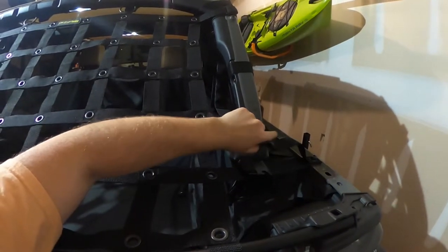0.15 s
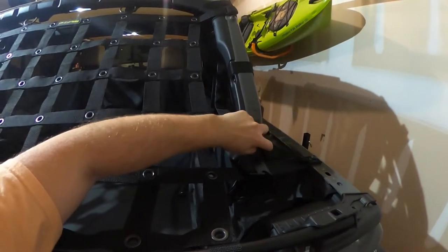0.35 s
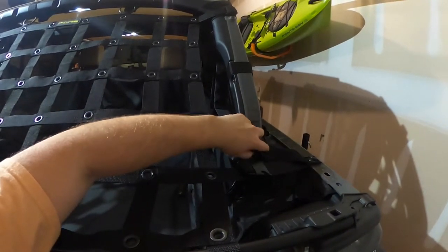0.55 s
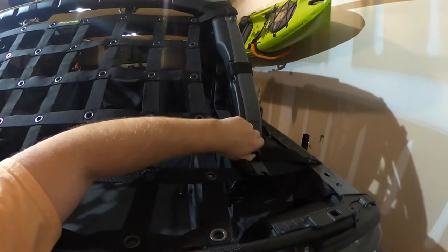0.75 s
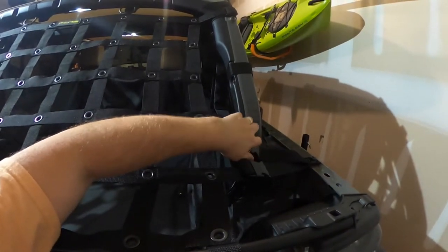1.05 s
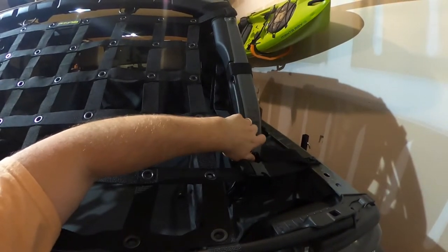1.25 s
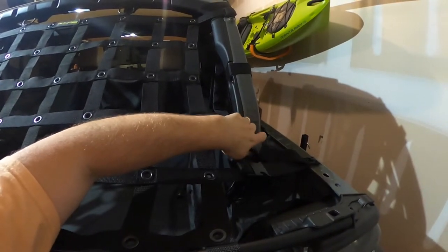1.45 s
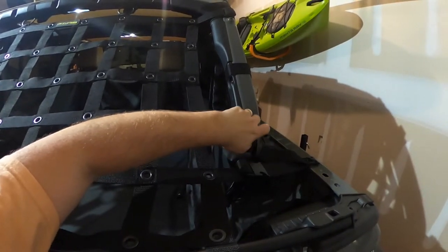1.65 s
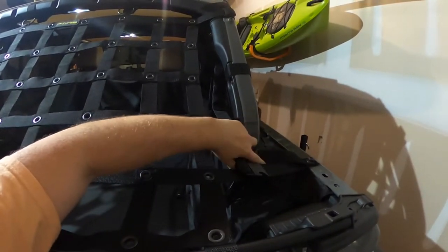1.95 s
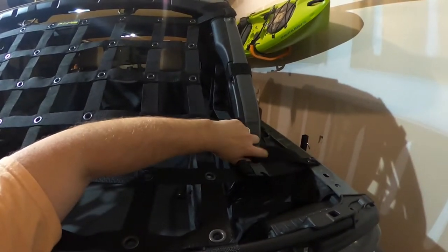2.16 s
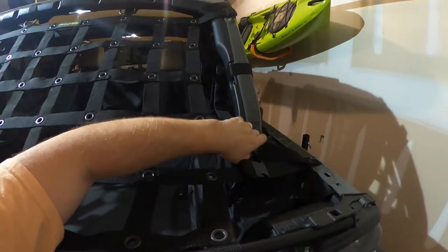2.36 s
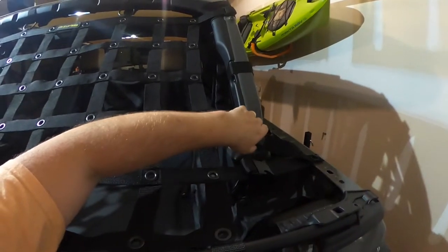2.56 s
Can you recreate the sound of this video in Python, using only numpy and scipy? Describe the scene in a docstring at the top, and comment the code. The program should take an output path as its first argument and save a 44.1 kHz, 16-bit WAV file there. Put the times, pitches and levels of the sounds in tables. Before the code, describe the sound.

Small metal buckle clicks and taps with faint strap rustle and soft knocks in an echoing garage

```python
"""Strap and buckle on a roll bar

A hand works a nylon strap and its metal buckle against a roll bar in a garage.
Buckle contacts are short noisy clicks that set the metal ringing; the webbing rustles as dense tiny grains.
Soft pushes knock the webbing and frame. The garage echoes, over a mains hum, a low rumble and a noise floor."""
import sys
import numpy as np
from scipy import signal
from scipy.fft import rfft, irfft
from scipy.io import wavfile

SR = 44100
rng = np.random.default_rng(int(sys.argv[2]) if len(sys.argv) > 2 else 0)


def to_wav(s):
    """Save 16-bit WAV."""
    ch = np.atleast_2d(s).T  # columns
    pcm = np.round(np.clip(ch, -1, 1) * 32767)  # PCM
    wavfile.write(sys.argv[1], SR, pcm.astype(np.int16))


N = 119070  # length of the scene in samples

# Noise floor, relative: pitch_hz, level_db (per Hz)
FLOOR_COLOUR = [(11, -33), (18, -4), (91, -5.5), (317, -10), (495, -15), (817, -24.5), (1140, -23.5),
                (2420, -28.5), (4350, -36.5), (7590, -38.5), (14000, -68)]
# Rumble over time, against RUMBLE_REFERENCE_DB: time_s, level_db
RUMBLE_LEVEL = [(0.0, -62), (0.61, -52.5), (0.69, -51.5), (0.83, -71), (1.04, -49.5), (1.23, -58.5),
                (1.41, -52), (1.62, -60), (1.98, -55), (2.16, -60.5), (2.56, -56), (2.7, -66)]
# Droning bands: pitch_hz, spread_hz (ring time is 4.9 / spread), level_db (added to DRONE_LEVEL)
DRONE_BANDS = [(38.4, 6.4, 8), (182.2, 9.1, 3.5), (281, 15.6, 1), (368, 4.2, -6.5)]
# Shared level of the droning bands over time: time_s, level_db
DRONE_LEVEL = [(0.0, -62.5), (0.8, -67), (1.02, -64.5), (2.09, -64.5), (2.2, -70.5), (2.7, -67)]
# Mains hum over time, before its waver: time_s, level_db
HUM_LEVEL = [(0.0, -64), (0.13, -66), (0.38, -58), (0.56, -53), (0.76, -51), (1.25, -52.5), (1.55, -56.5),
             (2.13, -53.5), (2.29, -49.5), (2.38, -52.5), (2.54, -52), (2.7, -61)]
# How alike left and right are in the room: pitch_hz, likeness (1 = the same)
LEFT_RIGHT_LIKENESS = [(30, 0.98), (120, 0.75), (280, 0.92), (600, 0.77), (2000, 0.093), (8000, 0.093)]
# Garage echo, time to fade by 60 dB: pitch_hz, fade_s
ECHO_FADE = [(700, 0.38), (2000, 0.41), (4000, 0.46), (8000, 0.48), (13000, 0.097)]
# Garage echo, relative: pitch_hz, level_db (per Hz)
ECHO_COLOUR = [(300, -17), (600, -10.5), (1200, -11), (2500, -5), (4000, -7), (5700, -10), (7700, 3),
               (9000, -3.5), (11000, -20), (14500, -53)]
# Knocks: start_s, level_db, webbing_pitch_hz, webbing_fade_s (by 60 dB), build_up_s, frame_db, edge_db
KNOCK_EVENTS = [(0.421, -54.5, 193, 0.23, 0.00092, 7, 5.5),
                (1.1556, -21.5, 188.7, 0.044, 0.00099, -13, -19.5),
                (1.379, -22, 190, 0.1, 0.00033, -8.5, -19.5),
                (2.012, -22.5, 188.5, 0.099, 0.0055, -37, -26.5), (2.109, -33, 182, 0.12, 0.001, -16, -21),
                (2.226, -24.5, 170, 0.11, 0.0099, -5, -29.5),
                (2.4408, -17.5, 199.5, 0.1, 0.00092, -2.5, -15.5)]
# Ringing of the frame: pitch_hz, level_db (relative), fade_s (by 60 dB)
FRAME_MODES = [(113, -17, 0.0082), (154, 4, 0.05)]
# Higher ringing from a knock's hard edge: pitch_hz, level_db (relative), fade_s (by 60 dB)
EDGE_MODES = [(422, -3, 0.045), (587, -2.5, 0.013), (800, -11, 0.039), (1140, -24.5, 0.05)]
# Strap strokes: start_s, rise_s, fall_s, level_db, metal_share (0 to 1), favoured_pitch_hz
STROKES = [(0.328, 0.029, 0.019, -66.5, 0.16, 3280), (0.547, 0.021, 0.094, -65, 0.65, 3440),
           (0.659, 0.026, 0.036, -72, 0.17, 5800), (0.808, 0.038, 0.049, -57, 0.62, 2870),
           (0.929, 0.048, 0.029, -66.5, 0.65, 2020), (1.038, 0.014, 0.048, -61, 0.62, 2480),
           (1.268, 0.026, 0.015, -57, 0.82, 2560), (1.501, 0.026, 0.017, -42, 0.82, 3400),
           (1.92, 0.022, 0.059, -65.5, 0.74, 7740), (2.104, 0.023, 0.048, -58, 0.3, 2010),
           (2.122, 0.026, 0.022, -70.5, 0.8, 3860), (2.112, 0.027, 0.036, -61, 0.44, 7500),
           (2.109, 0.0081, 0.016, -64, 0.5, 6300), (2.561, 0.044, 0.0099, -66, 1, 5560),
           (2.65, 0.031, 0.047, -75, 0, 1620)]
# Webbing rustle, relative: pitch_hz, level_db (per Hz)
WEBBING_COLOUR = [(530, -49), (900, 1.5), (964, 2.5), (2440, 1.5), (2740, -1.5), (3180, -9), (9920, -9),
                  (14000, -54)]
# Ringing of buckle and bar: pitch_hz, level_db (relative), fade_s (by 60 dB)
BAR_MODES = [(1170, -20, 0.09), (1382, -3, 0.013), (1810, -5, 0.0079), (2150, -12, 0.011),
             (2594, -16, 0.0056), (2953, -14, 0.01), (3320, -23, 0.072), (3770, -10.5, 0.0087),
             (4060, -29.5, 0.017), (4620, -8.5, 0.0038), (5320, -15.5, 0.011), (6407, -7.5, 0.007),
             (6800, -18.5, 0.0049), (7828, -8, 0.0051)]
# Buckle contacts: start_s, level_db, below_2khz_db, above_5khz_db, chatter_s,
# click_pitch_hz (favoured), ring_db, ring_pitch_hz (favoured)
CONTACTS = [(0.176, -39, -17, -8.5, 0.0032, 2150, 2, 2150),
            (0.4198, -45.5, -8, -2, 0.0035, 1810, -11.5, 1810),
            (0.6223, -43, -17, -3.5, 0.0046, 3940, 3, 4000), (0.841, -43, -3, -23, 0.0029, 2170, 4, 2700),
            (0.848, -28.5, -8, 0.5, 0.0026, 2520, 3.5, 4160),
            (1.0915, -27, 0.5, -22, 0.0023, 2470, 8, 1170),
            (1.0941, -18, -5, 0.5, 0.0047, 2470, -0.5, 3320),
            (1.2126, -29.5, -16, -9.5, 0.00042, 1950, 8.5, 1960),
            (1.2138, -31.5, 4, -12, 0.0013, 2000, 2, 2300), (1.3074, -35, -3, -4.5, 0.0032, 2400, 4, 2460),
            (1.3154, -39.5, -13, -1.5, 0.0046, 2400, 7, 3950),
            (1.3364, -24, -9.5, -6, 0.0046, 3720, -5, 4040), (1.5206, -30, -3, -9, 0.0094, 3670, 8, 3440),
            (1.524, -21.5, -9.5, -3.5, 0.0095, 3450, -8, 3560),
            (1.5355, -29, -3, -27, 0.0023, 3460, 5, 1700), (1.542, -45, -13, -53, 0.0017, 2500, -1, 2420),
            (1.608, -36, -27, -13, 0.0065, 3300, 5.5, 3350),
            (1.7755, -13.5, -8, -9.5, 0.0012, 1296, 0, 3600),
            (1.9923, -27.5, -4.5, 0, 0.005, 3040, 2, 3180),
            (2.1444, -34.5, -20, -21, 0.003, 3900, -1.5, 3900),
            (2.1534, -35.5, -5, -18.5, 0.0048, 3770, 7, 3750),
            (2.187, -31, -8, -11, 0.0019, 3850, -4, 3960)]
# Click noise, relative: pitch_hz, level_db (per Hz)
CLICK_COLOUR = [(300, -33), (800, -40), (1200, 16), (2500, 8.5), (4000, 4), (5700, 2.5), (7000, 9.5),
                (9500, -1.5), (12000, -24), (15000, -44)]

FLOOR_DB, FLOOR_PATCHY_DB, RUMBLE_REFERENCE_DB = -55.5, 1.5, -60.5
MURMUR_START_DB, MURMUR_END_DB = -1, -6.5  # the floor at 400-1000 Hz fades over the scene
HUM_HZ, HUM_WANDER_HZ, HUM_WAVER_DB, HUM_PAN_DB = 120.05, 1.48, 2.5, 0.5
ECHO_DB, ECHO_RISE_S, ECHO_ALIKE = -1.5, 0.0017, 0.8
PUSH_S, KNOCK_LOW_HZ, KNOCK_PAN_DB = 0.0037, 78.5, 2.95
RUB_GRAINS_PER_S, RUB_ALIKE, RUB_METAL_DB = 8100, 0.41, -5.0
RUB_FAVOUR_DB, RUB_FAVOUR_Q = 15, 9  # added band: level and sharpness
BAR_DB = -15
BAR_SPREAD_DB, BAR_DETUNE = 2, 0.007  # random spread of each mode's level and pitch (a fraction) per contact
CHATTER_PER_S, CHATTER_ALIKE = 3200, 0.9
CHATTER_FORCE_DB = -16  # how hard the chatter after the blow shakes the metal
CONTACT_S = 0.00012  # fade time of the blow's short 5 kHz burst
CLICK_FAVOUR_DB, CLICK_FAVOUR_Q = 10.5, 11
RING_FAVOUR_DB, RING_FAVOUR_Q = 7.5, 9
CLICK_DB, METAL_DB, BUCKLE_PAN_DB = -12.0, 0.5, 0.2
METAL_LOW_HZ = 910  # the metal ringing is thinned below this pitch
MIC_LOW_HZ, MIC_HIGH_HZ, CUTOFF_HZ = 22.3, 11600, 15400


def amp(db):
    """Turn decibels into a plain multiplier."""
    return 10 ** (np.asarray(db) / 20)


def rms_one(x):
    """Scale a sound to an average (rms) strength of 1."""
    return x / np.sqrt(np.mean(x ** 2) + 1e-20)


def at_hz(points, hz):
    """Read a table at a pitch, with straight lines between points on a log pitch scale."""
    pitches, values = np.array(points).T
    return np.interp(np.log(np.maximum(hz, 1)), np.log(pitches), values, left=values[0])


def in_time(curve):
    """Draw a table of times and values as a curve over the whole scene."""
    return np.interp(np.arange(N) / SR, *np.transpose(curve))


def pan(x, db):
    """Make the left side louder than the right by this many decibels."""
    return x * amp([[db / 2], [-db / 2]])


def stereo(mid, side, alike):
    """Mix two independent noises so that left and right share the wanted likeness."""
    alike = np.clip(alike, 0, 1)
    return np.sqrt(1 + alike) * mid + np.sqrt(1 - alike) * side * [[1], [-1]]


def drift(rate):
    """Smooth random wander of spread about 1; a higher rate in Hz wanders faster."""
    step = 40  # draw one value per 40 samples, then join them by lines
    r = np.exp(-2 * np.pi * rate * step / SR)
    noise = rng.standard_normal(N // step + 2002)
    slow = signal.lfilter([1], [1, -2 * r, r * r], noise)[2000:]  # drop the filter's start
    return np.interp(np.arange(N) / step, np.arange(len(slow)), rms_one(slow))


def ring(x, hz, t60):
    """A damped resonance: a unit click starts a sine of height about 1 that fades 60 dB in t60 seconds."""
    r = amp(-60 / (t60 * SR))
    w = 2 * np.pi * hz / SR
    return signal.lfilter([0, np.sin(w)], [1, -2 * r * np.cos(w), r * r], x + 1e-18)


def favour(x, hz, added_db, q):
    """Add a narrow band at hz to the sound, lifting one region of its spectrum."""
    return x + amp(added_db) * signal.lfilter(*signal.iirpeak(hz, q, fs=SR), x)


def colour(x, spectrum):
    """Shape the spectrum with a filter that acts as early as possible and keeps white noise as strong."""
    log_gain = at_hz(spectrum, np.linspace(0, SR / 2, 1025)) * np.log(10) / 20
    cepstrum = irfft(log_gain)
    cepstrum[1:1024] *= 2  # fold the second half onto the first: minimum phase
    cepstrum[1025:] = 0
    h = irfft(np.exp(rfft(cepstrum)))
    h = h / np.linalg.norm(h)
    return signal.oaconvolve(x, h[None], axes=-1)[..., :x.shape[-1]]


def grains(count, per_s, spread_db):
    """Random clicks of either sign and, if spread_db is not 0, uneven size; rms about 1."""
    size = amp(spread_db * np.minimum(rng.exponential(1, count), 4))
    signed = size * rng.choice([-1, 1], count)
    return rms_one(signed * (rng.random(count) < per_s / SR))


def bands():
    """Half-octave filters from 16 Hz up, each with its middle pitch."""
    edges = 16 * 2 ** np.arange(0, 10.1, 0.5)
    for low, high in zip(edges, edges[1:]):
        yield np.sqrt(low * high), signal.butter(2, [low, high], "band", fs=SR, output="sos")


def noise_floor():
    """Noise split into bands of patchy level, with a changing rumble at the bottom."""
    white, floor = rng.standard_normal((2, 2, N)), 0
    for k, (hz, sos) in enumerate(bands()):
        gain = amp(at_hz(FLOOR_COLOUR, hz) + FLOOR_PATCHY_DB * drift(8.1))
        if hz < 75:
            gain = gain * amp(in_time(RUMBLE_LEVEL) - RUMBLE_REFERENCE_DB)
        if 400 < hz < 1000:
            gain = gain * amp(np.linspace(MURMUR_START_DB, MURMUR_END_DB, N))
        mid, side = signal.sosfilt(sos, white[k % 2])
        floor = floor + gain * stereo(mid, side, at_hz(LEFT_RIGHT_LIKENESS, hz))
    return amp(FLOOR_DB) * rms_one(floor)


def drones():
    """Noise through narrow resonances hovers around a few pitches."""
    out = np.zeros((2, N))
    for hz, spread, db in DRONE_BANDS:
        mid, side = ring(rng.standard_normal((2, N)), hz, 4.9 / spread)
        tone = rms_one(stereo(mid, side, at_hz(LEFT_RIGHT_LIKENESS, hz)))
        out += amp(db + in_time(DRONE_LEVEL)) * tone
    return out


def mains_hum():
    """One sine whose pitch and level waver a little."""
    pitch = HUM_HZ + HUM_WANDER_HZ * drift(5.26)
    hum = np.sqrt(2) * np.sin(2 * np.pi * np.cumsum(pitch) / SR)
    return pan(amp(in_time(HUM_LEVEL) + HUM_WAVER_DB * drift(15)) * hum, HUM_PAN_DB)


def garage(force):
    """Reverberation: stereo noise that dies band by band, convolved with the source."""
    t = np.arange(SR) / SR
    white, tail = rng.standard_normal((2, 2, SR)), 0
    for k, (hz, sos) in enumerate(bands()):
        if hz > 400:
            mid, side = signal.sosfilt(sos, white[k % 2])
            tail = tail + stereo(mid, side, ECHO_ALIKE) * amp(-60 * t / at_hz(ECHO_FADE, hz))
    tail = colour(tail * (1 - np.exp(-t / ECHO_RISE_S)), ECHO_COLOUR)
    tail = tail / np.linalg.norm(tail[0])
    return amp(ECHO_DB) * signal.fftconvolve(tail, force[None], axes=1)[:, :N]


def knocks():
    """A soft push twangs the taut webbing and shakes the frame; its hard edge knocks higher modes."""
    out, t = np.zeros(N), np.arange(8000) / SR
    push = np.sin(np.pi * np.minimum(t / PUSH_S, 1)) / (PUSH_S * SR / 2)
    for s, db, hz, t60, build, frame_db, edge_db in KNOCK_EVENTS:
        twang = ring(push, hz, t60)
        frame = sum(amp(g + frame_db) * ring(push, f, d) for f, g, d in FRAME_MODES)
        edge = sum(-amp(g + edge_db) * ring(t == 0, f, d) for f, g, d in EDGE_MODES)
        build_up = 1 - np.exp(-t / build)
        i = int(s * SR)
        out[i:i + len(t)] += amp(db) * ((twang + frame) * build_up + edge)
    no_bass = signal.butter(2, KNOCK_LOW_HZ, "high", fs=SR, output="sos")
    return pan(signal.sosfilt(no_bass, out + 1e-18), KNOCK_PAN_DB)


def bar(force, chance=np.zeros((len(BAR_MODES), 2))):
    """The damped modes of buckle and bar; chance shifts each mode's strength and pitch."""
    out = 0
    for (hz, db, t60), (louder, sharper) in zip(BAR_MODES, chance):
        mode = ring(force, hz * (1 + BAR_DETUNE * sharper), t60)
        out = out + amp(db + BAR_SPREAD_DB * louder) * mode
    return amp(BAR_DB) * out


def strap():
    """Dense fibre grains under each stroke; part of them shakes the bar. Also returns the echo's source."""
    t, cloth, metal = np.arange(N) / SR, np.zeros((2, N)), np.zeros(N)
    mid = grains(N, RUB_GRAINS_PER_S, spread_db=3.0)
    side = grains(N, RUB_GRAINS_PER_S, spread_db=4.0)
    fibres = stereo(mid, side, RUB_ALIKE) * amp(2.0 * drift(130))  # uneven by about 2 dB
    for s, rise, fall, db, share, hz in STROKES:
        span = slice(int(s * SR), int((s + 0.3) * SR))
        u = t[span] - s - rise  # time from the stroke's peak
        swell = np.clip(1 + u / rise, 0, 1) ** 2
        stroke = amp(db) * np.where(u < 0, swell, np.exp(-np.maximum(u, 0) / fall))
        rub = favour(fibres[:, span] * stroke, hz, RUB_FAVOUR_DB, RUB_FAVOUR_Q)
        cloth[:, span] += (1 - share) * rub
        metal[span] += share * rub.mean(0)
    metal = amp(RUB_METAL_DB) * bar(metal)
    return colour(cloth, WEBBING_COLOUR) + metal, cloth.mean(0) + metal


def buckle():
    """Each contact is a hard click and a dying chatter that ring the metal. Also returns the echo's source."""
    crack, force, metal = np.zeros((2, N)), np.zeros(N), np.zeros(N)
    t = np.arange(3500) / SR
    no_low = signal.butter(2, 2000, "high", fs=SR, output="sos")
    no_high = signal.butter(2, 5000, "low", fs=SR, output="sos")
    for s, db, low_db, high_db, length, hz, ring_db, ring_hz in CONTACTS:
        mid, side = (grains(len(t), CHATTER_PER_S, spread_db=0.0) for _ in range(2))
        burst = stereo(mid, side, CHATTER_ALIKE) * np.exp(-t / length)
        burst[:, 0] = 0.58  # the first hard click
        blow = 0.25 * np.exp(-t / CONTACT_S) * np.cos(2 * np.pi * 5000 * t)
        blow = blow + amp(CHATTER_FORCE_DB) * burst.mean(0)
        touch = amp(db) * np.vstack([burst, blow])
        # set the low and high parts against the middle
        for sos, part_db in ((no_low, low_db), (no_high, high_db)):
            kept = signal.sosfilt(sos, touch)
            touch = kept + amp(part_db) * (touch - kept)
        push = amp(ring_db) * favour(touch[2], ring_hz, RING_FAVOUR_DB, RING_FAVOUR_Q)
        chance = np.clip(rng.standard_normal((len(BAR_MODES), 2)), -1.5, 1.5)
        start = int(s * SR)
        span = slice(start, start + len(t))
        crack[:, span] += amp(CLICK_DB) * favour(touch[:2], hz, CLICK_FAVOUR_DB, CLICK_FAVOUR_Q)
        force[span] += push
        metal[span] += bar(push, chance)
    metal = signal.sosfilt(signal.butter(3, METAL_LOW_HZ, "high", fs=SR, output="sos"), metal)
    clicks = colour(crack, CLICK_COLOUR) + amp(METAL_DB) * metal
    return pan(clicks, BUCKLE_PAN_DB), force + metal


def scene():
    """Add the room, the knocks, the strap, the buckle and the garage's echo of the last two."""
    clicks, hits = buckle()
    rustle, rubs = strap()
    room = noise_floor() + drones() + mains_hum()
    return room + garage(hits + 0.2 * rubs) + knocks() + rustle + clicks


def record(dry):
    """The microphone loses the deepest bass and the top; a steep filter then cuts the top."""
    mic_band = signal.butter(2, [MIC_LOW_HZ, MIC_HIGH_HZ], "band", fs=SR, output="sos")
    top_cut = signal.cheby2(12, 70, CUTOFF_HZ, fs=SR, output="sos")  # 70 dB down from the cutoff up
    return signal.sosfilt(top_cut, signal.sosfilt(mic_band, dry))


dry = scene()
out = record(dry)
to_wav(out)
```